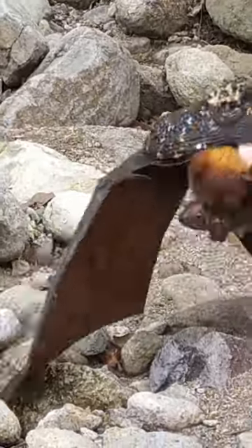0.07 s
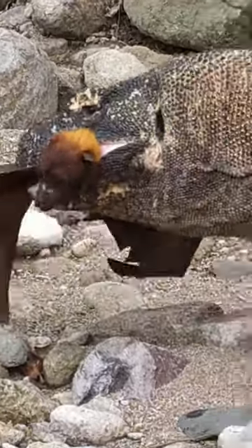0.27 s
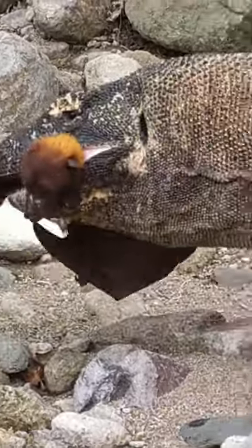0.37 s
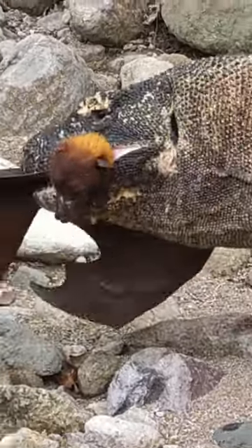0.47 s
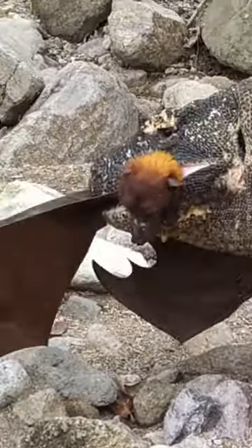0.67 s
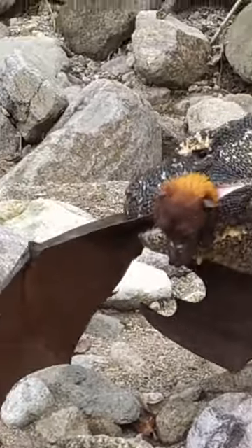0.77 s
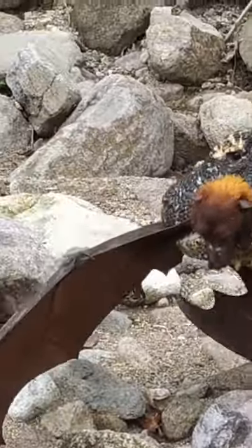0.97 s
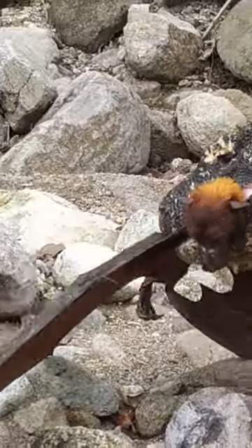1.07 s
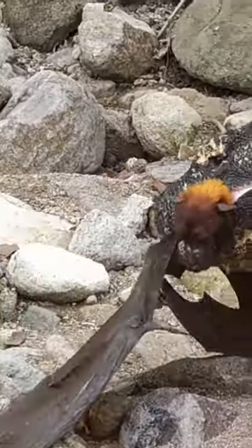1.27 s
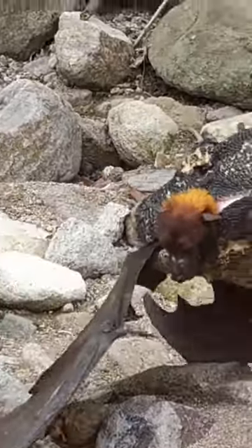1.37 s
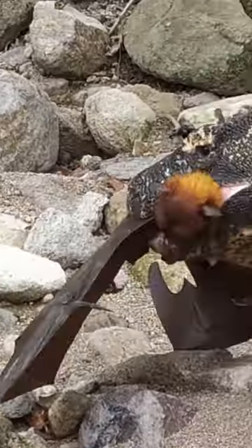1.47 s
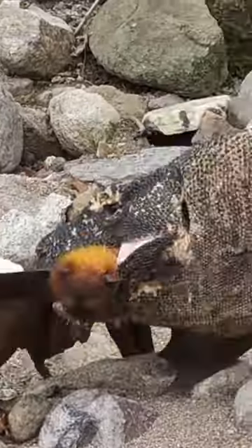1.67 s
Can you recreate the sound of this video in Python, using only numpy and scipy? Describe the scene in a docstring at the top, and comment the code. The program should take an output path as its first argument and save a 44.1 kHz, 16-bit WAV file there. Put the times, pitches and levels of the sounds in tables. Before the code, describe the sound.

One close, raspy bat squawk, with soft scuffling on gravel and low wind.

```python
"""On a stony bank, close to the microphone, a fruit bat squawks once in the jaws of a large reptile.
Its shrill voice starts as a chaotic rasp of the vocal membranes, then settles into a falling tone
with the sidebands of a second, slower oscillation. Nearby boulders throw the call back.
Wings and body rustle and knock on the gravel, over low wind at the microphone and a faint hiss."""
import sys
import numpy as np
from scipy import signal
from scipy.fft import rfft, irfft
from scipy.io import wavfile
from scipy.ndimage import uniform_filter1d

SR = 44100
rng = np.random.default_rng(int(sys.argv[2]) if len(sys.argv) > 2 else 0)


def unload_wav(signal):
    """Save mono or channel-first audio to the path in sys.argv[1] as 16-bit WAV at rate SR, clipped to [-1, 1]."""
    wavfile.write(
        sys.argv[1],
        SR,
        np.round(np.clip(np.atleast_2d(signal).T, -1, 1) * 32767).astype(np.int16),
    )


N = 74970
T = np.arange(N) / SR
HZ = np.fft.rfftfreq(N, 1 / SR)

# wind at the microphone (f/Hz, level/dB) and its gusts (t/s, level/dB)
WIND_SPECTRUM = [(20, -32), (35, -11), (55, 2), (75, 0.5), (120, -9), (190, -18), (400, -31), (600, -38),
                 (900, -39), (1500, -47.5)]
GUSTS = [(0, -46.5), (.04, -50.5), (.06, -52), (.09, -50.5), (.33, -50), (.39, -40.5), (.43, -46),
         (.5, -52.5), (.62, -51), (.7, -56), (.8, -49.5), (.84, -62), (.89, -54), (1.0, -56), (1.2, -54),
         (1.35, -53.5), (1.48, -56.5), (1.56, -49), (1.61, -61.5), (1.65, -47), (1.7, -69)]
# background hiss (f/Hz, level/dB)
HISS_SPECTRUM = [(500, 2), (800, -12), (1800, -6.5), (2400, -8), (3200, -5.5), (5200, -8.5), (6400, 0),
                 (9500, -3), (12000, -5.5), (15600, -18)]
# skin on sand: its colour (f/Hz, level/dB) and its course (t/s, level/dB)
RUSTLE_SPECTRUM = [(200, -15.5), (700, -9), (2300, -15), (3300, -6), (4400, -9), (5400, -8), (6400, -4),
                   (9500, 0.5), (12000, -8), (15500, -19.5)]
RUSTLE_LEVEL = [(0, -91), (.1, -73), (.125, -54.5), (.16, -52), (.21, -60.5), (.58, -66.5), (.7, -65),
                (.8, -64), (.86, -64.5), (.89, -56), (.94, -67.5), (1.05, -66.5), (1.2, -63.5), (1.28, -59),
                (1.36, -60.5), (1.4, -63.5), (1.43, -62.5), (1.5, -67.5), (1.565, -73.5), (1.585, -54.5),
                (1.625, -62.5), (1.65, -50.5), (1.7, -43.5)]
# ticks of grit (t/s, level/dB, t60/s)
GRIT_TICKS = [(0.105, -47, .02), (.762, -49.5, 0.0055), (0.876, -47, 0.013), (1.143, -48.5, 0.01),
              (1.3635, -42.5, 0.0092), (1.441, -55, 0.0068), (1.4581, -50, .006), (1.663, -39, 0.0063)]
# body on stone (t/s, scuff level/dB, centre f/Hz, width/Hz, t60/s, thud level/dB)
BODY_KNOCKS = [(0.121, -59, 1400, 2380, 0.24, -51.5), (0.149, -52, 1550, 1790, 0.1, -51.5),
               (0.845, -64, 1700, 400, 0.038, -70), (0.877, -62.5, 3390, 900, .07, -73),
               (1.118, -62, 1651, 300, 0.024, -72), (1.326, -65, 1105, 1976, 0.11, -70),
               (1.573, -53, 2880, 1820, 0.042, -91.5), (1.589, -63, 2180, 2200, .03, -63),
               (1.601, -50, 1130, 1000, 0.028, -74.5), (1.659, -60, 1360, 1486, 0.45, -61.5),
               (1.687, -37.5, 1660, 456, .09, -44.5)]
# pitch of the vocal membranes (t/s, f/Hz)
PITCH = [(.219, 1380), (.226, 1466), (.231, 2018), (.238, 2178), (.262, 2119), (.284, 1953), (.34, 1908),
         (.39, 1911), (.408, 1878), (.425, 1839), (.465, 1826), (.54, 1805), (.555, 1757), (.59, 1833)]
# the main tone and its overtones (each t/s, level/dB)
TONE_LEVEL = [(.217, -47), (.221, -35.5), (.227, -39), (.2305, -14), (.233, -13), (.237, -15), (.242, -26),
              (.26, -21), (.297, -25.5), (.301, -36.5), (.306, -17.5), (.321, -27.5), (.327, -22),
              (.339, -18), (.351, -30), (.361, -31), (.373, -15), (.379, -31.5), (.387, -21.5),
              (.406, -19.5), (.426, -25.5), (.46, -26.5), (.53, -29), (.548, -36), (.556, -26), (.571, -27),
              (.579, -36.5), (.59, -88)]
OVERTONE_LEVEL = [(.217, -64), (.221, -29), (.226, -31.5), (.231, -18.5), (.265, -22), (.3, -26),
                  (.34, -25), (.351, -31.5), (.365, -26), (.383, -27.5), (.4, -38), (.45, -33.5),
                  (.535, -38), (.545, -42), (.551, -49.5), (.572, -52), (.59, -66.5)]
# from clear voice to full rasp (t/s, roughness/0-1)
ROUGHNESS = [(.22, 0.56), (.227, 0.8), (.233, .4), (.243, 1), (.29, .85), (.375, .65), (.4, 0.2),
             (.425, 0.2), (.535, .1), (.55, 0.42), (.58, 0.05)]
# the slower oscillation (t/s, f/Hz, hum level/dB)
SLOW_OSCILLATION = [(.22, 578.4, -74.5), (.255, 576.1, -46.5), (.273, 520.2, -51), (.345, 522.2, -46.5),
                    (.39, 477, -53.5), (.43, 486, -63), (.54, 485.5, -66), (.58, 503, -78)]
# combination tones (multiple of the pitch, multiple of the slow rate, level/dB, drift/(dB/s))
SIDEBANDS = [(1, -1, -17, -2.5), (2, -4, -17, 27.5), (2, -2, -9, 4.5), (3, -5, -12, 49),
             (2, -1, -7.5, 59.5), (2, 0, -12.5, -150), (3, -2, -16, -0.5), (1, 1, -17.5, 2.5),
             (5, -2, -18.5, -1), (3, 0, -21.5, -37), (6, -2, -19, 29.5), (6, -3, -21, 92)]
# the throat, open while rough and narrow while clear (each f/Hz, level/dB)
OPEN_THROAT = [(300, -32), (1100, -36.5), (1450, -2.5), (1800, -0.5), (2350, -2), (2900, 2), (3600, 0.5),
               (4100, -2.5), (4500, -13), (5100, -8), (5600, -16.5), (5900, -24), (6200, -7.5), (6600, -7),
               (7250, -13), (8400, -4), (9600, -12.5), (11200, -14.5), (12400, -30), (13900, -23),
               (14800, -47.5)]
NARROW_THROAT = [(300, -13), (1080, -24), (1450, -6.5), (1900, 5.5), (2400, -4), (3600, -6.5), (4250, -6.5),
                 (4750, 0), (5000, -22.5), (5250, -22), (5450, -2.5), (6250, -11.5), (6750, -10),
                 (7200, -18), (8100, 0.5), (8800, -2.5), (9600, 3.5), (11200, -2.5), (12400, -14),
                 (13500, -12.5), (15000, -30.5)]
# a throat resonance that sinks through the rasp (t/s, f/Hz, level/dB)
FORMANT = [(.225, 4300, -12), (.248, 3800, -3), (.258, 3300, 3), (.268, 3200, 6), (.28, 3150, 1),
           (.295, 3450, -3), (.32, 3600, -2), (.39, 3600, -3)]
# treble against the other overtones (t/s, level/dB)
TREBLE_LEVEL = [(.22, -4.5), (.24, -3), (.27, 0.5), (.3, -3), (.35, 1), (.375, -8), (.4, 4), (.45, -5.5),
                (.48, -2), (.53, 1), (.56, -3)]
# random patches of colour, shallower below the treble (f/Hz, share of full depth)
PATCH_DEPTH = [(3800, .4), (5500, 1)]


def amp(db):
    """Decibels to gain."""
    return 10 ** (np.asarray(db) / 20)


def unit(x):
    """Scales to rms 1."""
    return x / np.sqrt(np.mean(x ** 2) + 1e-20)


def curve(rows, column=1):
    """One column of a timed table, at every sample."""
    rows = np.array(rows)
    return np.interp(T, rows[:, 0], rows[:, column])


def colour(x, spectrum):
    """Filters by a table (f/Hz, level/dB), to rms 1."""
    hz, db = np.transpose(spectrum)
    return unit(irfft(rfft(x) * amp(np.interp(np.log(HZ + 1), np.log(hz), db)), N))


def noise():
    """White noise."""
    return rng.standard_normal(N)


def band(hz, width_hz):
    """Noise in one steep resonance."""
    return unit(irfft(rfft(noise()) / (1 + ((HZ - hz) / width_hz) ** 2) ** 2, N))


def wander(hz):
    """Random motion of rms 1, up to about the given rate."""
    return unit(irfft(rfft(noise()) * np.exp(-(HZ / hz) ** 2 / 2), N))


def strike(start, rise_s, t60):
    """A quick rise and an exponential decay."""
    age = np.maximum(T - start, 0)
    return np.minimum(age / rise_s, 1) * np.exp(-np.log(1000) * np.maximum(age - rise_s, 0) / t60)


def resonate(x, hz, width_hz):
    """A resonance of gain 1 that follows a frequency curve."""
    turn = np.exp(2j * np.pi * np.cumsum(hz) / SR)
    pole = np.exp(-np.pi * width_hz / SR)
    return 2 * (turn * signal.lfilter([1 - pole], [1, -pole], x / turn)).real


def wind():
    """Gusts rumble at the microphone over a faint, steady hiss."""
    rumble = amp(curve(GUSTS)) * colour(noise(), list(WIND_SPECTRUM) + [(4000, -72)])
    return rumble + amp(-65.5) * colour(noise(), HISS_SPECTRUM)


def struggle(grains_per_s=890, grain_spread_db=11):
    """Skin rustles on sand, grit ticks, and the body knocks softly on the stones."""
    grain_gain = amp(grain_spread_db * np.minimum(rng.exponential(1, N), 4))
    grains = noise() * grain_gain * (rng.random(N) < grains_per_s / SR)
    out = amp(curve(RUSTLE_LEVEL)) * colour(noise() + .14 * unit(grains), RUSTLE_SPECTRUM)
    for start, db, t60 in GRIT_TICKS:
        out += amp(db) * strike(start, rise_s=.00013, t60=t60) * colour(noise(), RUSTLE_SPECTRUM)
    for start, db, hz, width_hz, t60, thud_db in BODY_KNOCKS:
        scuff = amp(db) * band(hz, width_hz)
        thud = amp(thud_db) * band(hz=292, width_hz=160)
        out += strike(start, rise_s=.00138, t60=t60) * (scuff + thud)
    return out


def squawk(start_s=.216, end_s=.595):
    """The bat, close up: fast vocal membranes and a slower oscillation pass from chaos to a clear tone."""
    rough = np.clip(curve(ROUGHNESS), 0, 1)
    pitch_hz = curve(PITCH) * (1 + .035 * rough * wander(hz=246.3))
    slow_hz = curve(SLOW_OSCILLATION) * (1 + .012 * wander(hz=120))
    fast_phase = 2 * np.pi * np.cumsum(pitch_hz) / SR
    slow_phase = 2 * np.pi * np.cumsum(slow_hz) / SR
    shimmer = 1 + .35 * rough ** 2 * wander(hz=240.2)
    tone = amp(curve(TONE_LEVEL)) * np.sin(fast_phase) * shimmer
    hum = amp(curve(SLOW_OSCILLATION, column=2)) * np.sin(slow_phase)
    pulses, breath = membranes(fast_phase, slow_phase, rough)
    overtones = shift_colour(throat(pulses, breath, rough))
    overtones += np.sqrt(2) * (1 - rough) ** 2 * sidebands(fast_phase, slow_phase)
    overtones += amp(-32.5) * band(hz=620, width_hz=1400)  # hoarse noise below the tone
    voice = np.sqrt(2) * (tone + hum) + amp(curve(OVERTONE_LEVEL)) * overtones
    return voice * ((T > start_s) & (T < end_s))


def membranes(fast_phase, slow_phase, rough, chaos_rad=.9, swing_rad=1.6, slip_rad=.45):
    """Pulses of harmonics 2-8 and puffs of breath, swung and chopped by the slower oscillation."""
    flap = np.sin(slow_phase + chaos_rad * np.sqrt(rough) * wander(hz=130))
    swung = fast_phase + swing_rad * flap + slip_rad * rough * wander(hz=600)
    gate = 1 + .9 * flap
    pulses = unit(gate * sum(np.cos(k * swung + 2 * np.pi * rng.random()) for k in range(2, 9)))
    breath = unit(gate * (1 + np.cos(swung)) * noise())
    return pulses, breath


def throat(pulses, breath, rough):
    """The throat colours the voice: wide open in the fluttering rasp, narrower as it clears."""
    rasp_db = -3.5 + 2 * wander(hz=168.6)
    rasp = amp(rasp_db) * colour(pulses + .35 * breath, OPEN_THROAT)
    rasp += amp(curve(FORMANT, column=2)) * resonate(rasp, curve(FORMANT), width_hz=600)
    clear = amp(-10) * colour(pulses + .3 * breath, NARROW_THROAT)
    blend = np.pi / 2 * rough
    return np.sin(blend) * rasp + np.cos(blend) * clear


def shift_colour(x, patch_db=6, patch_hz=200, patch_s=.06, treble_hz=6040):
    """The colour of the overtones shifts in random patches, and the treble swells and sinks."""
    hz, t, spectra = signal.stft(x, SR, nperseg=600, noverlap=450)
    patches = uniform_filter1d(rng.standard_normal(spectra.shape), round(patch_hz / hz[1]), axis=0)
    patches = unit(uniform_filter1d(patches, round(patch_s / t[1]), axis=1))
    shelf = 1 / (1 + np.exp((treble_hz - hz[:, None]) / 500))
    treble_db = shelf * np.interp(t, *np.transpose(TREBLE_LEVEL))
    depth_db = patch_db * np.interp(hz, *np.transpose(PATCH_DEPTH))[:, None]
    spectra *= amp(depth_db * np.minimum(patches, 1) + treble_db)
    return signal.istft(spectra, SR, nperseg=600, noverlap=450)[1][:N]


def sidebands(fast_phase, slow_phase, settled_s=.48):
    """Combination tones of the two oscillations; each swells, fades and slips a little."""
    drift_s = np.clip(T - settled_s, -.06, .06)
    out = np.zeros(N)
    for k, n, db, db_per_s in SIDEBANDS:
        phase = round(k) * fast_phase + round(n) * slow_phase
        slip_rad = .3 * wander(hz=90) + 2 * np.pi * rng.random()
        swell_db = 2.2 * wander(hz=18)
        out += amp(db + db_per_s * drift_s + swell_db) * np.sin(phase + slip_rad)
    return out


def boulder_echo(call):
    """Close reflections off the boulders reach the microphone, then a faint outdoor tail."""
    near = noise() * (rng.random(N) < .05) * strike(.000998, rise_s=.00033, t60=.0046)
    near = colour(near, [(2200, -20.5), (3000, 1), (12000, -2)])
    tail = unit(noise() * strike(.0049, rise_s=.01, t60=.65))
    response = (amp(-8) * near + amp(-32) * tail)[:SR] / np.sqrt(N)
    return signal.fftconvolve(call, response)[:N]


def scene():
    """Wind, struggle and the close call with its echo, at one microphone on the bank."""
    call = squawk()
    return (wind() + struggle() + call + boulder_echo(call))[None]


def record(dry, edge_hz=15750):
    """The recorder cuts off the highest treble."""
    lowpass = signal.firwin(511, edge_hz, window=("kaiser", 9), fs=SR)
    return signal.oaconvolve(dry, lowpass[None], "same")


dry = scene()
out = record(dry)
unload_wav(out)
```